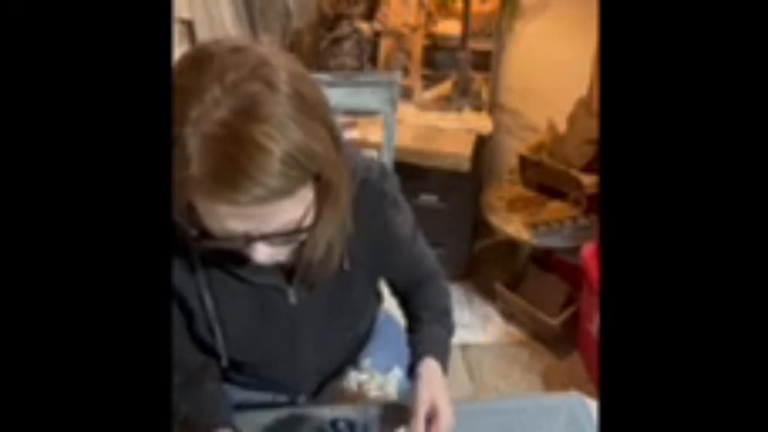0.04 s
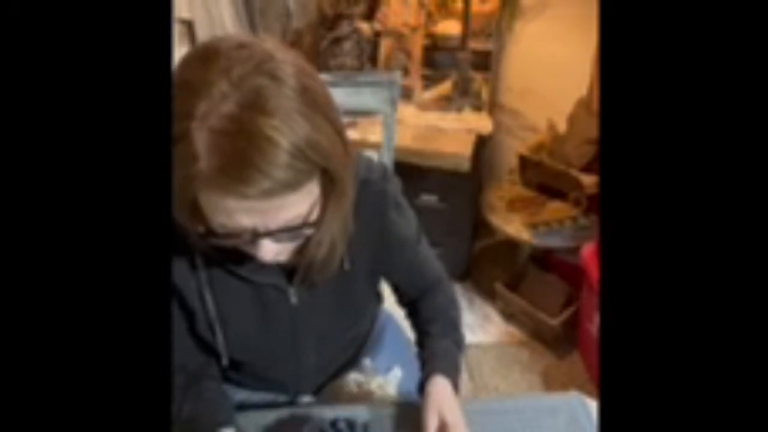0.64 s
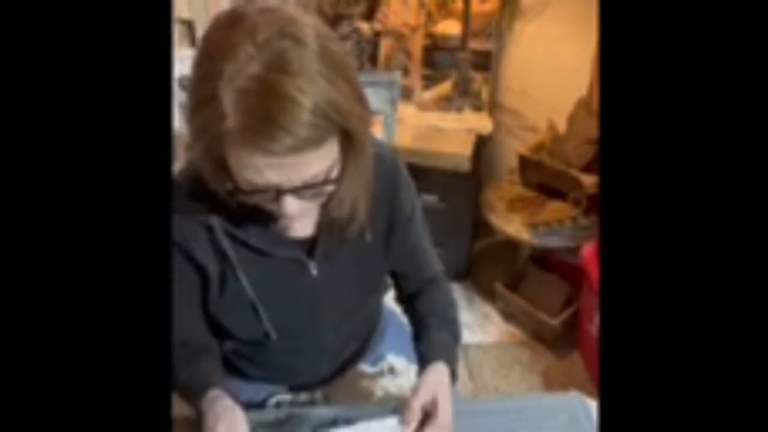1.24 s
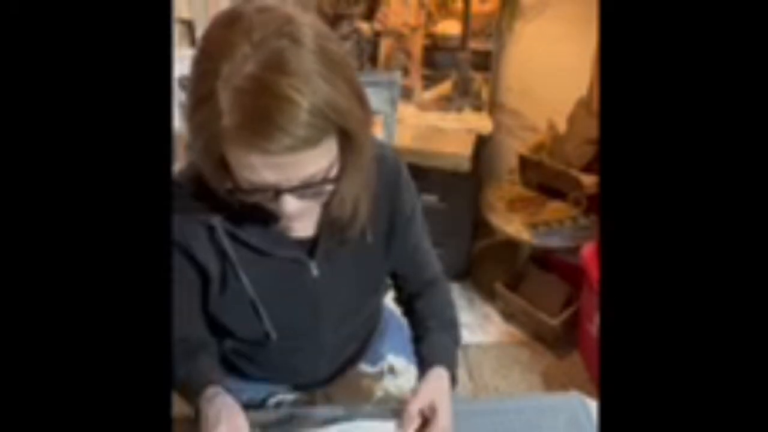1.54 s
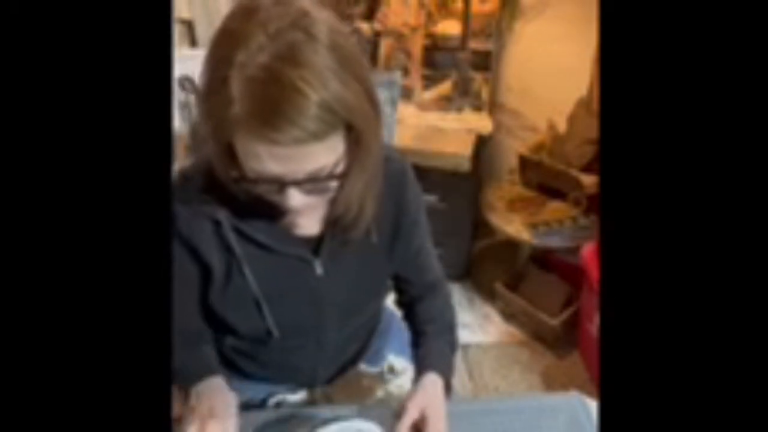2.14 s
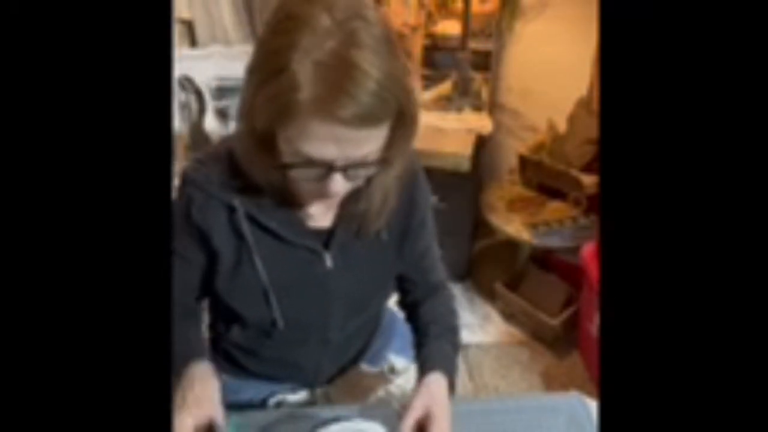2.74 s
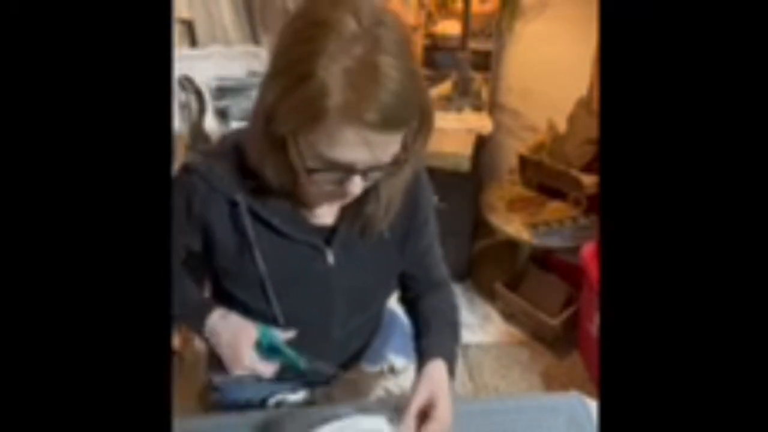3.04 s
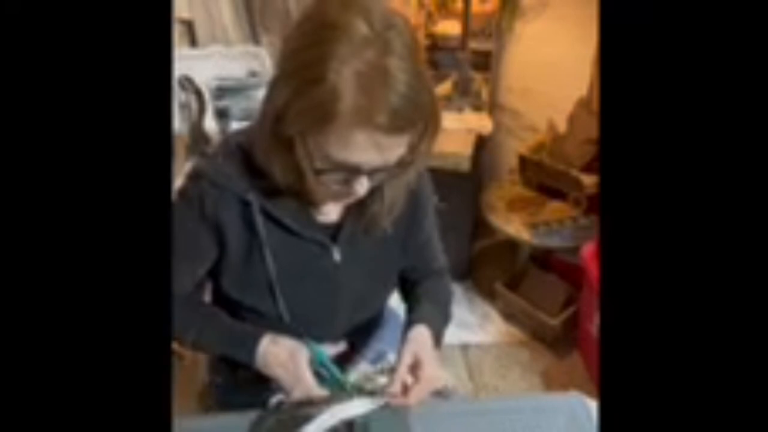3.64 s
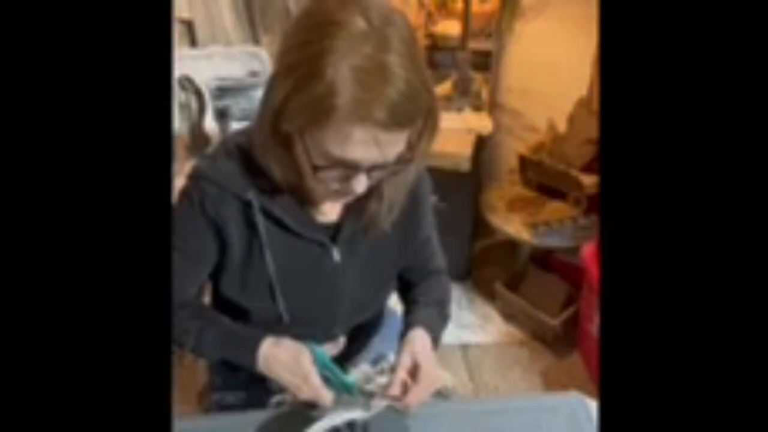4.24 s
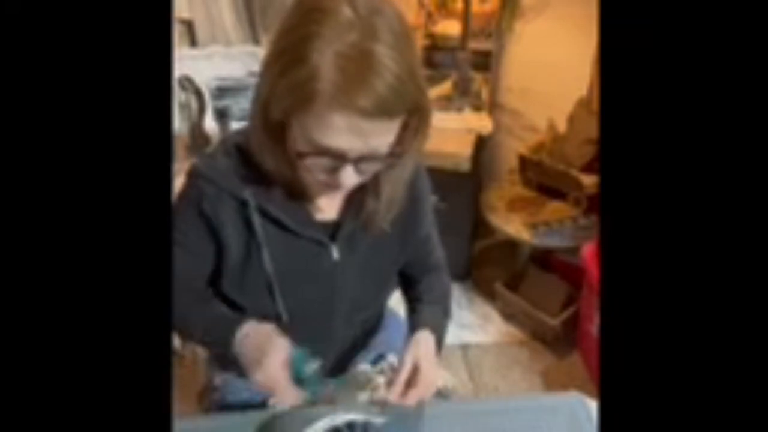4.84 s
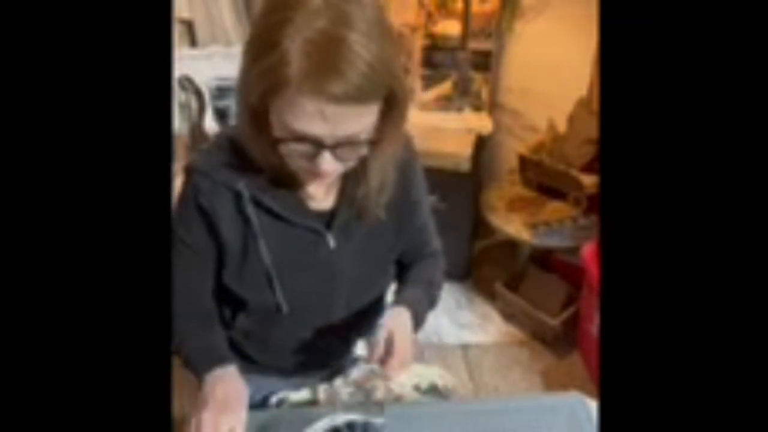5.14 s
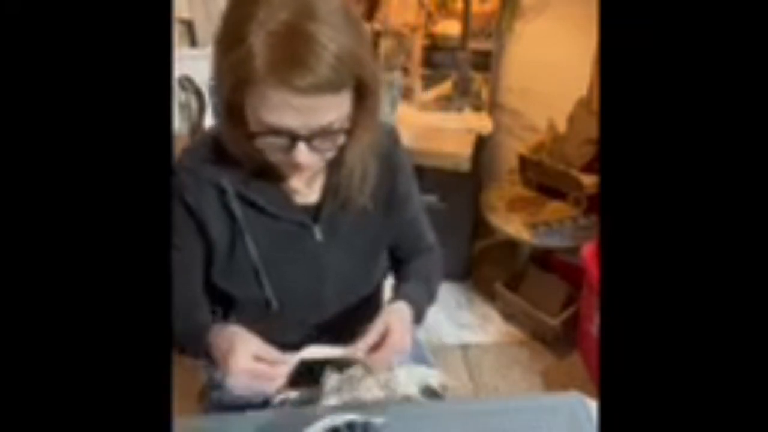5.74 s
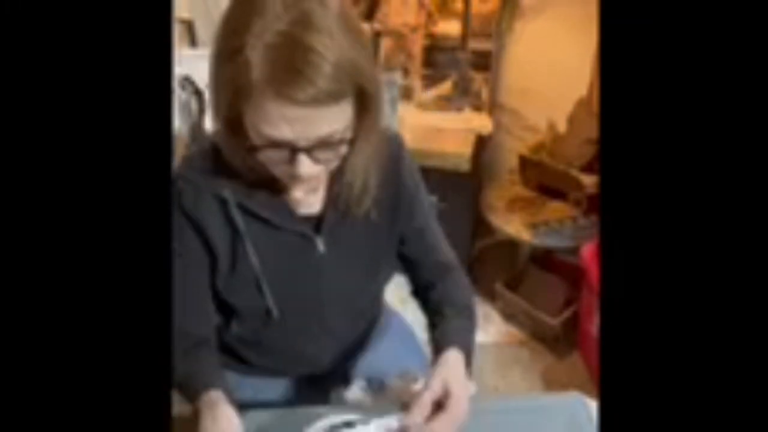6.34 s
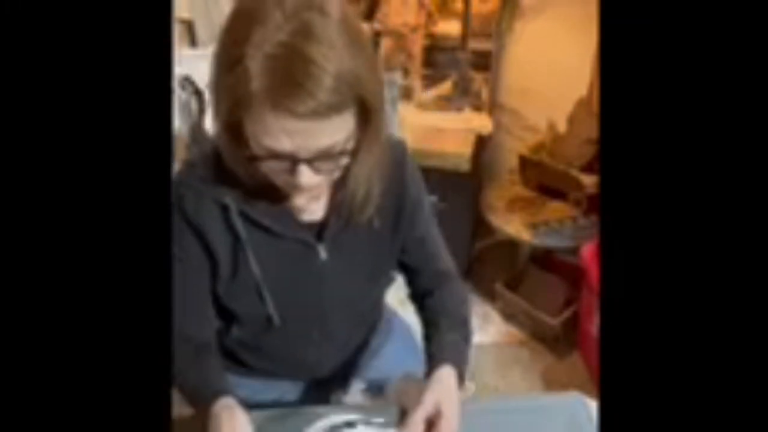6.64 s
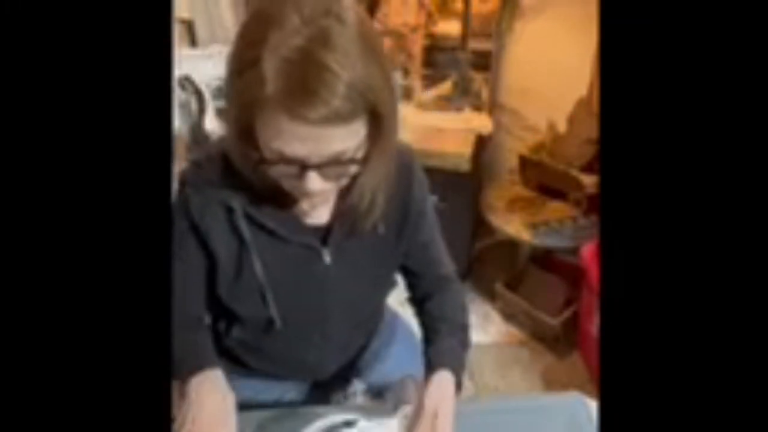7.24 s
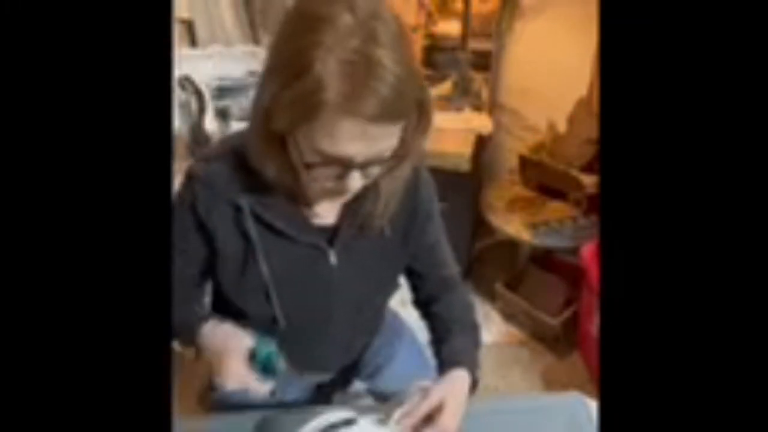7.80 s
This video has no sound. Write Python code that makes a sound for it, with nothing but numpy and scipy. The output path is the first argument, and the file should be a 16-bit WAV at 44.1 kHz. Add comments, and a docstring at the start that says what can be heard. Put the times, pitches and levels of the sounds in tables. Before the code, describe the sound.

Cloth rustles softly on a craft table, with a few light taps and dull bumps from leaning hands. A faint low motor hum comes and fades. Scissors scrape off the table, make two short snips through the fabric and are put down with a loud double clack. More rustling, a brief scrape and lighter knocks follow. It is all heard from close by in a small room, over a low rumble.

```python
"""Cloth is worked at a craft table in a small room, over a low rumble and a faint hiss. The table booms
under leaning hands, the weave rustles by friction, and small impacts ring a tool and the table top.
A far motor hums from 1.2 s and runs down as scissors slide off the table with stick-slip squeaks.
From 3 s the blades shear the threads in two snips; at 5 s they are put down with a loud double clack
that excites the table's modes. More rustling and a few lighter knocks follow."""
import sys
import numpy as np
from scipy import signal
from scipy.fft import rfft, irfft, next_fast_len
from scipy.io import wavfile

SR = 44100
rng = np.random.default_rng(int(sys.argv[2]) if len(sys.argv) > 2 else 0)


def log_audio(samples):
    """Write samples as a 16-bit WAV file to the path given in sys.argv[1]."""
    # one column per channel
    frames = np.atleast_2d(samples).T
    # limit to full scale, then quantise
    limited = np.clip(frames, -1, 1)
    pcm = np.round(limited * 32767).astype(np.int16)
    wavfile.write(sys.argv[1], SR, pcm)


N = 351414
TIME = np.arange(N) / SR


def from_db(db):
    """Amplitude ratio of a level."""
    return 10 ** (np.asarray(db) / 20)


def unit_rms(x):
    """Normalisation to rms 1."""
    return x / np.sqrt(np.mean(x ** 2) + 1e-20)


def level_at(spectrum, hz):
    """Interpolation of a spectrum on a logarithmic frequency axis."""
    freqs, levels = np.transpose(spectrum)
    return np.interp(np.log(np.maximum(hz, 1)), np.log(freqs), levels)


def colour(x, spectrum):
    """Linear filtering by multiplication in the frequency domain."""
    size = next_fast_len(N)
    hz = np.arange(size // 2 + 1) * SR / size
    return irfft(rfft(x, size) * from_db(level_at(spectrum, hz)), size)[:N]


def noise(spectrum):
    """Coloured Gaussian noise, rms 1."""
    return unit_rms(colour(rng.standard_normal(N), spectrum))


def band(x, low, high, order=2):
    """Band-pass filtering between two frequencies."""
    return signal.sosfilt(signal.butter(order, [low, high], "band", fs=SR, output="sos"), x)


def resonator(x, hz, width_hz):
    """Forced response of one damped mode."""
    return band(x, hz - width_hz / 2, hz + width_hz / 2, order=1)


def resonance(x, hz, octaves):
    """Response of a resonance of given relative bandwidth, rms 1."""
    return unit_rms(band(x, hz / 2 ** (octaves / 2), hz * 2 ** (octaves / 2)))


def drift(per_s):
    """Random modulation: straight lines between Gaussian values, rms 1."""
    knots = rng.standard_normal(4000)
    return unit_rms(np.interp(TIME * per_s, np.arange(len(knots)), knots))


def ramp(middle, length):
    """Linear transition from 0 to 1 around a moment."""
    return np.clip((TIME - middle) / length + .5, 0, 1)


def gate(start, length, edge_s):
    """Trapezoidal envelope."""
    return np.minimum(ramp(start, edge_s), 1 - ramp(start + length, edge_s))


def swell(middle, length, db):
    """Gaussian envelope, its length being two standard deviations."""
    coarse = TIME[::64]
    bell = from_db(db) * np.exp(-2 * ((coarse - middle) / length) ** 2)
    return np.interp(TIME, coarse, bell + 1e-12)


def add(out, start, x):
    """Superposition of a sound from its start time on."""
    i = int(start * SR)
    out[i:i + len(x)] += x[:N - i]


def fibres(per_s, spread_db, spectrum):
    """Shot noise: threads catch and let go at random, in clicks of uneven size; rms 1."""
    sizes = from_db(spread_db * np.minimum(rng.exponential(1, N), 4)) * rng.choice([-1, 1], N)
    return unit_rms(colour(sizes * (rng.random(N) < per_s / SR), spectrum))


# course of the rumble: t/s, level/dB
RUMBLE_LEVELS = [(0, -56.5), (0.28, -53), (0.9, -49), (1.0, -63.5), (1.6, -60.5), (2.55, -59), (5.45, -59),
                 (6.7, -65), (7.15, -55.5), (7.97, -62)]
# its spectrum: f/Hz, relative level/dB
RUMBLE_SPECTRUM = [(15, -14.5), (30, -5), (45, 9.5), (62, 12), (95, 11.5), (115, -17), (160, -60.5)]

def rumble(gain_db=-1.0):
    """Structure-borne sound: low noise of varying level travels through the building."""
    times, levels = np.transpose(RUMBLE_LEVELS)
    return from_db(np.interp(TIME, times, levels) + gain_db) * noise(RUMBLE_SPECTRUM)


# spectrum of the hiss: f/Hz, relative level/dB
HISS_SPECTRUM = [(210, -30), (350, -9), (457, -2), (649, -9), (1190, -13.5), (1780, -12.5), (2530, -17),
                 (4020, -18), (6210, -18.5), (10000, -36.5), (13000, -73)]

def hiss(hiss_db=-82, whine_db=-108, whine_hz=8785):
    """Stationary noise floor: a broadband hiss with a thin pure tone in it."""
    whine = np.sqrt(2) * np.sin(2 * np.pi * whine_hz * TIME)
    return from_db(hiss_db) * noise(HISS_SPECTRUM) + from_db(whine_db) * whine


# a hand leans on the table: middle t/s, duration/s, level/dB, f/Hz
LEANS = [(0.305, 0.33, -50.5, 119.7), (0.61, 0.38, -50.5, 100.8), (0.86, 0.098, -44, 116.6),
         (2.193, 0.1, -48.5, 147), (4.172, 0.056, -45, 153), (4.54, 0.054, -46.5, 138),
         (6.46, 0.058, -50.5, 163.5), (6.882, 0.11, -56.5, 153.7)]

def leaning_hands():
    """Forced vibration: the unsteady push of a hand drives a low resonance of the table."""
    push = rng.standard_normal(N)
    return sum(swell(s, length, db) * resonance(push, hz, octaves=0.31) for s, length, db, hz in LEANS)


# the hands move the cloth: middle t/s, duration/s, level/dB, swish f/Hz
CLOTH_MOVES = [(0.24, 0.059, -79, 5560), (0.759, 0.052, -70.5, 6300), (1.084, 0.032, -78.5, 6560),
               (2.02, 0.033, -79.5, 7000), (2.523, 0.047, -69, 4340), (2.59, 0.031, -71, 4450),
               (2.677, 0.0083, -70, 5800), (2.74, 0.09, -79, 5950), (2.934, 0.21, -85.5, 7150),
               (3.808, 0.082, -79, 7700), (5.686, 0.11, -76, 6050), (5.87, 0.1, -80.5, 6800),
               (5.97, 0.089, -77.5, 5900), (6.437, 0.022, -75, 6230), (6.665, 0.02, -79, 4280),
               (6.738, 0.043, -77.5, 5800), (6.809, 0.048, -75.5, 4800), (7.8, 0.15, -84, 6000)]
# spectrum of the rubbing weave: f/Hz, relative level/dB
CLOTH_SPECTRUM = [(300, -7), (1000, -3), (2800, -6), (3600, 0), (4300, 1), (5500, 0.5), (7000, -1.5),
                  (8200, -6), (10000, -25.5)]

def cloth_rustle(gain_db=-5.5, fold_db=-3, swish_db=-5.0, fidget_db=-96, uneven_db=1.5):
    """Friction noise: the weave rubs, folds crinkle, and each move swishes at a pitch set by its speed."""
    weave = fibres(per_s=2000, spread_db=-0.5, spectrum=CLOTH_SPECTRUM)
    folds = fibres(per_s=80, spread_db=3, spectrum=CLOTH_SPECTRUM)
    friction = weave + from_db(fold_db) * folds
    out = from_db(fidget_db) * friction   # the fingers never quite rest
    for s, length, db, hz in CLOTH_MOVES:
        swish = from_db(swish_db) * resonance(friction, hz, octaves=0.45)
        out += swell(s, length, db) * (friction + swish)
    return out * from_db(gain_db + uneven_db * drift(per_s=37))


# spectrum of the table's boom: f/Hz, relative level/dB
BOOM_SPECTRUM = [(70, -38.5), (105, -7.5), (125, -1), (170, -1.5), (205, -12), (260, -22.5), (350, -25.5),
                 (600, -52), (1200, -66.5)]

def table_boom(rest_db=-60, coupling_db=9):
    """Mechanical coupling: each move of the cloth stirs the table, adding in power to its resting boom."""
    moves = sum(swell(s, length, db) for s, length, db, _ in CLOTH_MOVES)
    return np.hypot(from_db(rest_db), from_db(coupling_db) * moves) * noise(BOOM_SPECTRUM)


# reverberation against the direct sound: f/Hz, level/dB
REVERB_SPECTRUM = [(120, -9.5), (300, -8), (700, -8.5), (1800, -1), (4000, -7), (9000, -12.5)]

def room_responses(places=1, t60=0.37, treble_loss=0.33, first_echo_s=0.0062, build_s=0.00031,
                   slap_s=0.015, slap_db=-16.5):
    """Reverberation: one near reflection and a diffuse decay, faster in the treble; a row per place."""
    t = np.arange(SR // 2) / SR
    edges = 60 * 2 ** np.arange(9)   # octave bands
    onset = 1 - np.exp(-np.maximum(t - first_echo_s, 0) / build_s)
    tail = np.zeros((places, len(t)))
    for low, high in zip(edges, edges[1:]):
        hz = np.sqrt(low * high)
        decay = from_db(-60 * t / t60 * (1 + treble_loss * hz / 5000))
        echoes = band(rng.standard_normal(tail.shape), low, high, order=3) * onset * decay
        energy = np.sum(echoes ** 2, axis=1, keepdims=True)
        tail += from_db(level_at(REVERB_SPECTRUM, hz)) * echoes * np.sqrt(2 * (high - low) / SR / energy)
    tail[:, int(slap_s * SR)] += from_db(slap_db)
    return tail


# friction against the table and the blades: things dragged over the table, and the blades scraping and ringing
# during the snips: t/s, duration/s, f/Hz, bandwidth/octaves, level/dB
SCRAPES = [(0.225, 0.032, 880, 0.7, -76.5), (2.431, 0.024, 980, 0.18, -66), (2.508, 0.031, 970, 0.27, -69),
           (2.574, 0.026, 884, 0.28, -66.5), (2.747, 0.02, 2400, 0.12, -76.5),
           (3.052, 0.061, 2860, 1, -78.5), (3.763, 0.16, 4060, 0.07, -85), (4.54, 0.089, 3040, 0.73, -75),
           (7.283, 0.092, 3900, 0.84, -71), (7.479, 0.041, 734, 0.75, -58.5)]

def scrapes(uneven_db=2.0):
    """Stick-slip friction drives a resonance of the sliding thing: narrow ones squeak, broad ones scrape."""
    slips = rng.standard_normal(N) * from_db(uneven_db * drift(per_s=150))
    return sum(from_db(db) * gate(s, length, edge_s=0.014) * resonance(slips, hz, octaves)
               for s, length, hz, octaves, db in SCRAPES)


# light touches: a tool on the table, and last a click of the scissors: t/s, level/dB, tilt about 1 kHz/(dB per
# octave)
TAPS = [(0.4975, -26.5, -1.5), (1.8756, -18, 1), (1.964, -38, 3), (2.011, -46, 6), (4.0465, -38.5, 6)]
# modes of the tool: f/Hz, bandwidth/Hz, level/dB
TOOL_MODES = [(690, 170, -4.5), (1130, 100, -3), (1406, 240, -3.5), (4630, 320, -4.5), (6900, 1500, -16)]

def tool_taps():
    """Impulse response: each touch rings the tool's damped modes, a harder one favouring the upper modes."""
    out, room = np.zeros(N), room_responses()[0]
    click = signal.unit_impulse(SR // 8)
    for s, db, tilt in TAPS:
        ring = sum((-1) ** k * from_db(db + mode_db + tilt * np.log2(hz / 1000))
                   * resonator(click, hz, width) for k, (hz, width, mode_db) in enumerate(TOOL_MODES))
        add(out, s, ring)
        add(out, s, signal.fftconvolve(ring, room))
    return out


def spot_gain_db(hz, antinode_hz, node_hz, antinode_db=4.5, node_db=-12.5, octaves=0.31):
    """Mode shapes: a blow favours modes with an antinode at the struck spot and starves those with a node."""
    favoured = np.exp(-.5 * (np.log2(hz / antinode_hz) / octaves) ** 2)
    avoided = np.exp(-.5 * (np.log2(hz / node_hz) / octaves) ** 2)
    return antinode_db * favoured + node_db * avoided


# edges of the bands that group the table's modes into families: f/Hz
FAMILY_EDGES = [45, 240, 460, 820, 1250, 2200, 3200, 4900, 8600]
# strength of each family: level/dB
FAMILY_GAINS = [0.6, -0.5, 3, 0.5, -1.65, -6.5, -3, -0.5]

def family_levels(db, tilt, thud_db, antinode_hz, node_hz, top_hz, thud_share=0.42):
    """Impact spectrum: weight sets the low thud; hardness tilts the other families and sets their top."""
    edges = np.array(FAMILY_EDGES[1:])
    centres = np.sqrt(edges[:-1] * edges[1:])
    slope_db = tilt * np.log2(centres / 1000)
    softness_db = 10 * np.log10(1 + (centres / top_hz) ** 6)
    body, *upper = db + slope_db + spot_gain_db(centres, antinode_hz, node_hz) - softness_db
    return np.array([db + thud_db, body + thud_share * thud_db, *upper]) + FAMILY_GAINS


# modes of table top and scissors together: f/Hz, level/dB
TABLE_MODES = [(72, -9.5), (118, -2.5), (172, 4.5), (303, 6), (333, 8.5), (412, -2.5), (572, 5.5), (620, 7),
               (754, 4), (915, 2.5), (1040, 1.5), (1260, 8), (1450, 3.5), (1720, 2.5), (2010, 1.5),
               (2680, 2.5), (3750, 0), (4120, 7), (4560, 0.5), (5250, 0), (6400, 4), (6950, -2.5)]
# the crowd of small modes against the main ones: f/Hz, level/dB
CRACK_SPECTRUM = [(150, -3.5), (600, -6.5), (2000, -2.5), (6000, 5)]

def family_ring(low, high, tuning, antinode_hz, node_hz, vary_db=3.5, t60_at_1khz=0.032, t60_slope=0.067,
                linger_db=-20.5, linger_t60=0.19, crack_life=0.92,
                contact_s=0.00059, snap_db=4.5, snap_s=0.0013):
    """Damped free vibration of one family of modes, the higher the shorter; rms 1 over the first 20 ms."""
    t = np.arange(SR // 4) / SR
    attack = t < .02
    centre = np.sqrt(low * high)
    fall_db = -60 * t / t60_at_1khz * (centre / 1000) ** t60_slope
    modes = sum((-1) ** k * from_db(db + spot_gain_db(hz, antinode_hz, node_hz) + vary_db * rng.normal())
                * np.sin(2 * np.pi * hz * tuning * t)
                for k, (hz, db) in enumerate(TABLE_MODES) if low <= hz < high)
    modes *= from_db(fall_db) + from_db(linger_db - 60 * t / linger_t60)   # a weak part rings on
    # small modes overlap into a short crack of noise
    crack = band(rng.standard_normal(len(t)) * from_db(fall_db / crack_life), low, high, order=3)
    crack *= from_db(level_at(CRACK_SPECTRUM, centre)) / np.std(crack[attack])
    # the first instant of contact snaps out above the ring, briefest in the treble
    snap = from_db(snap_db) * np.exp(-(t / snap_s) ** 2 * np.sqrt(centre / 4000))
    onset = 1 - np.exp(-t / contact_s)
    ring = (modes / np.std(modes[attack]) + crack) * onset * (1 + snap)
    return ring / np.std(ring[attack])


# blows on the table: t/s, level at 1 kHz/dB, tilt/(dB per octave), thud over that level/dB,
# favoured f/Hz, avoided f/Hz, upper limit of the contact f/Hz
KNOCKS = [(0.8322, -56.5, -2.5, -6.5, 1610, 590, 4140), (0.8406, -65.5, 0, -0.5, 3500, 696, 4170),
          (2.3445, -70.5, -8, 22, 920, 1960, 1300), (2.6216, -64, -2, 20, 515, 2170, 7800),
          (5.0249, -36.5, 1, 7, 648.6, 10200, 11000), (5.0352, -49, -0.5, 11.5, 310, 1070, 5000),
          (5.0519, -51.5, 0, 1.5, 613, 1100, 10000), (5.137, -40.5, 0.9, -6.5, 2700, 500, 10000),
          (5.1403, -33, -1.5, 3.5, 325, 524, 1220), (5.2111, -49.5, 0, 8.5, 700, 2500, 9100),
          (5.3268, -67, -2.5, 11.5, 1208, 2670, 9200), (7.092, -68, -3.5, -5.5, 750, 333, 4270),
          (7.124, -86.5, -10, 27.5, 600, 2020, 1400), (7.2717, -57.5, -3.5, -0.5, 338, 629, 5800),
          (7.381, -46.5, -0.5, 8.5, 700, 433, 8300)]

def table_knocks(gain_db=-0.5, detune=0.0057, travel_s=0.0028, pitched_tail_hz=1250):
    """Dispersion: low bending waves cross the table more slowly, so each blow's thud trails its tick."""
    out = np.zeros(N)
    for knock, room in zip(KNOCKS, room_responses(places=len(KNOCKS))):
        s, strength_db, tilt, thud_db, antinode_hz, node_hz, top_hz = knock
        tuning = 1 + detune * rng.normal()   # the hand's load shifts the modes a little
        levels = family_levels(strength_db, tilt, thud_db, antinode_hz, node_hz, top_hz)
        for db, low, high in zip(levels, FAMILY_EDGES, FAMILY_EDGES[1:]):
            ring = from_db(db + gain_db) * family_ring(low, high, tuning, antinode_hz, node_hz)
            # the room keeps the pitch of the few low modes; the many high ones blend into an even tail
            if high <= pitched_tail_hz:
                tail = signal.fftconvolve(ring, room)
            else:
                tail = band(room, low, high, order=4) * np.sqrt(np.sum(ring ** 2) * SR / 2 / (high - low))
            centre = np.sqrt(low * high)
            arrival = s + travel_s * max(np.sqrt(1000 / centre) - .5, 0)
            add(out, arrival, ring)
            add(out, arrival, tail)
    return out


def far_motor(start_s=1.2, load_s=1.433, stop_s=2.66, attack_s=0.052, release_s=0.31,
              start_hz=80, sag_hz_per_s=5.7, idle_db=-54.5, load_db=-46.7, fade_db_per_s=5.5, waver_db=0.66):
    """Rotation hum: its pitch sinks with the speed; it grows louder under load, then fades and stops."""
    hz = start_hz - sag_hz_per_s * (TIME - start_s)
    hum = np.sqrt(2) * np.sin(2 * np.pi * np.cumsum(hz) / SR)
    load = ramp(load_s, attack_s)
    db = (1 - load) * idle_db + load * (load_db - fade_db_per_s * (TIME - load_s))
    running = ramp(start_s, attack_s) * (1 - ramp(stop_s, release_s))
    return running * from_db(db + waver_db * drift(per_s=10.75)) * hum


# blade strokes: t/s, duration/s, level/dB
BLADE_STROKES = [(3.069, 0.0096, -65.5), (3.075, 0.048, -69.5), (3.762, 0.13, -90), (4.27, 0.067, -60),
                 (4.435, 0.066, -77), (4.514, 0.0054, -74), (4.53, 0.015, -68), (4.544, 0.044, -63.5),
                 (4.578, 0.048, -81), (4.602, 0.0077, -72), (4.638, 0.0071, -78)]
# spectrum of the shearing: f/Hz, relative level/dB
SHEAR_SPECTRUM = [(240, -57), (400, 1), (795, -1.5), (947, -24), (1270, -19), (1600, -8), (2100, -12.5),
                  (2900, -17.5), (3640, -22.5), (4580, 4), (5030, 1), (6160, -2.5), (10000, -11),
                  (13000, -69)]
# modes of the blades: f/Hz, level/dB
BLADE_MODES = [(3800, -2), (4720, 0), (6250, -6)]

def scissor_snips(steel_db=-6, ring_hz=4000, ring_db=-1.0, glide=0.21, overtone=1.55, overtone_db=-2.5,
                  edge_s=0.029, uneven_db=4.0):
    """Shearing threads excites the blades' modes; two resonances rise as the crossing runs to the tips."""
    shear = fibres(per_s=800, spread_db=3, spectrum=SHEAR_SPECTRUM)
    steel = unit_rms(sum(from_db(db) * unit_rms(resonator(shear, hz, width_hz=110))
                         for hz, db in BLADE_MODES))
    # modulation by low noise widens each gliding tone into a band
    lower, upper = np.sqrt(2) * unit_rms(band(rng.standard_normal((2, N)), 28, 380))
    out = np.zeros(N)
    for s, length, db in BLADE_STROKES:
        closure = np.clip((TIME - s) / length, 0, 1)
        hz = ring_hz * np.exp(glide * (closure - .5))
        phase = 2 * np.pi * np.cumsum(hz) / SR
        ring = lower * np.sin(phase) + from_db(overtone_db) * upper * np.sin(overtone * phase)
        cut = unit_rms(shear + from_db(steel_db) * steel + from_db(ring_db) * ring)
        out += from_db(db) * gate(s, length, min(edge_s, length / 2)) * cut
    return out * from_db(uneven_db * drift(per_s=110))


# response of the microphone: f/Hz, gain/dB
MICROPHONE_RESPONSE = [(20, -11), (60, 5.5), (7500, 3), (8000, -12), (9000, -7.5), (10200, -13.5)]

def microphone(blows, port_hz=8790, port_db=7.0):
    """Transducer response: bass and top roll off, and sharp blows ring the resonance of the port."""
    shaped = colour(blows, MICROPHONE_RESPONSE)
    return shaped + from_db(port_db) * resonator(shaped, port_hz, width_hz=70)


def scene(rubbing_wet_db=-1.5, cutting_wet_db=-1.0):
    """Superposition of close hands and tools, their reverberation and the background, in one channel."""
    cutting = scissor_snips()
    rubbing = scrapes() + cloth_rustle()
    into_room = from_db(rubbing_wet_db) * rubbing + from_db(cutting_wet_db) * cutting
    echoes = signal.fftconvolve(into_room, room_responses()[0])[:N]
    blows = microphone(table_knocks() + tool_taps())
    background = leaning_hands() + rumble() + table_boom() + far_motor() + hiss()
    return (blows + cutting + rubbing + echoes + background)[None]


def record(dry, dip_s=0.972, dip_length_s=0.022, dip_db=-15.5, cutoff_hz=10200):
    """Attenuation and band limiting: the level dips briefly once, and a steep low-pass cuts the top."""
    dip = from_db(dip_db * swell(dip_s, dip_length_s, db=0))
    low_pass = signal.ellip(10, .2, 80, cutoff_hz, fs=SR, output="sos")
    return signal.sosfilt(low_pass, dry * dip)


dry = scene()
out = record(dry)
log_audio(out)
```